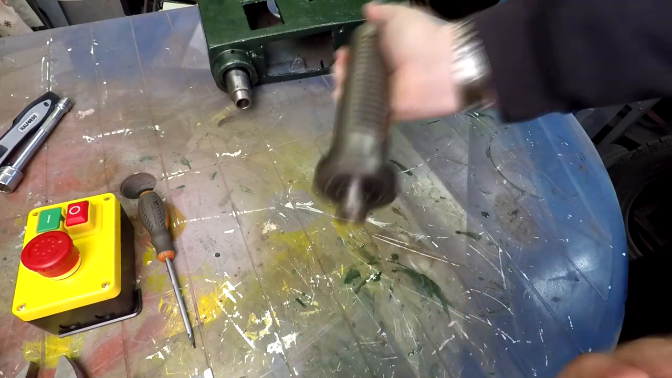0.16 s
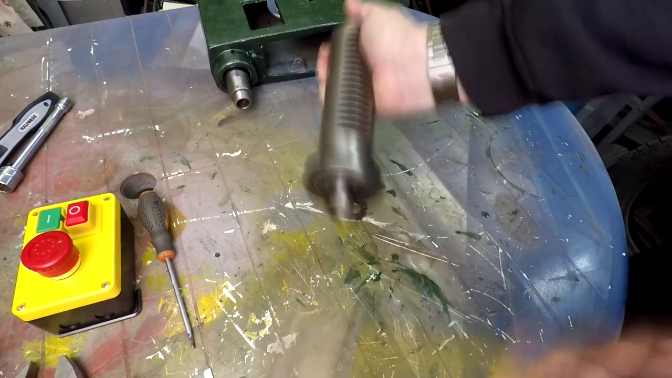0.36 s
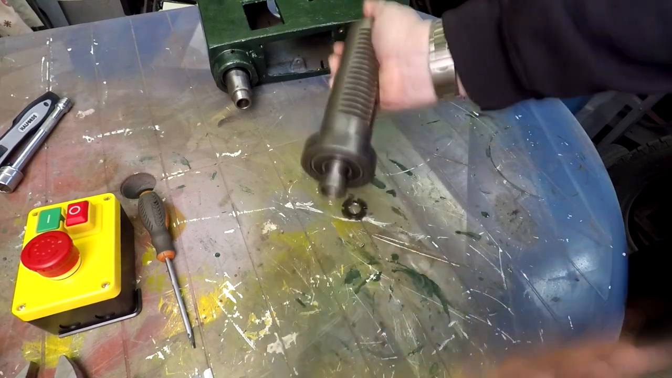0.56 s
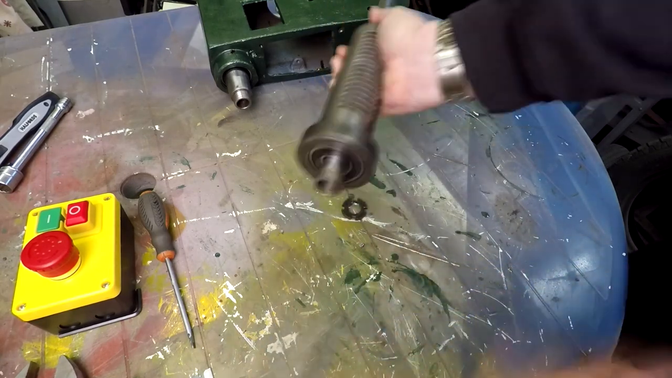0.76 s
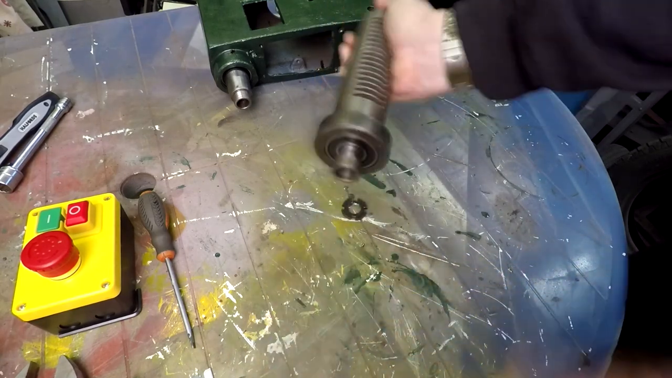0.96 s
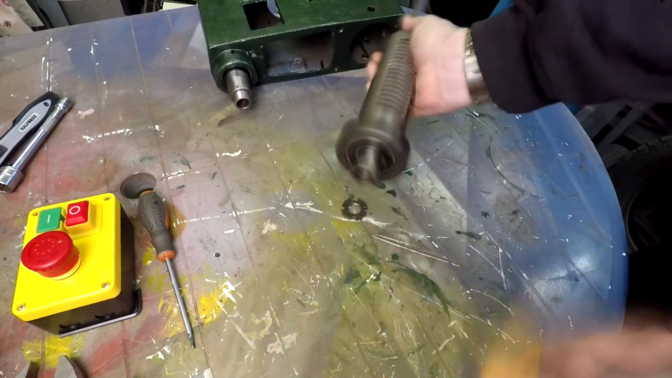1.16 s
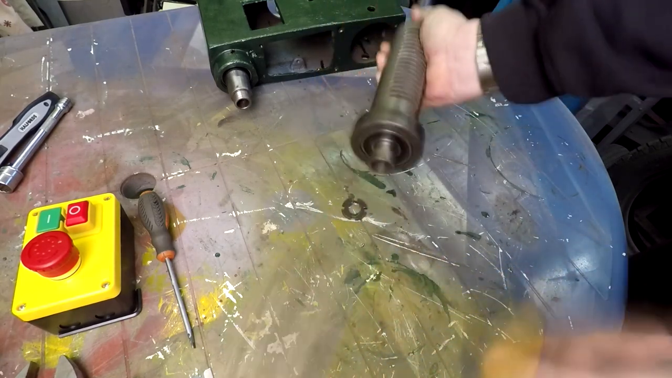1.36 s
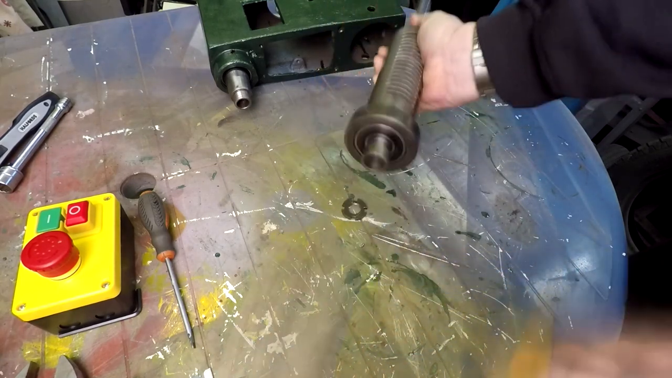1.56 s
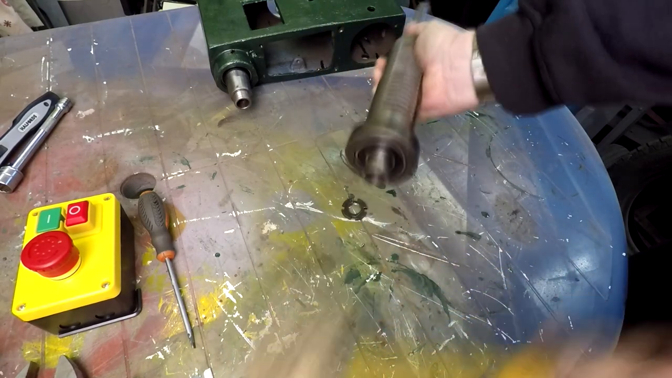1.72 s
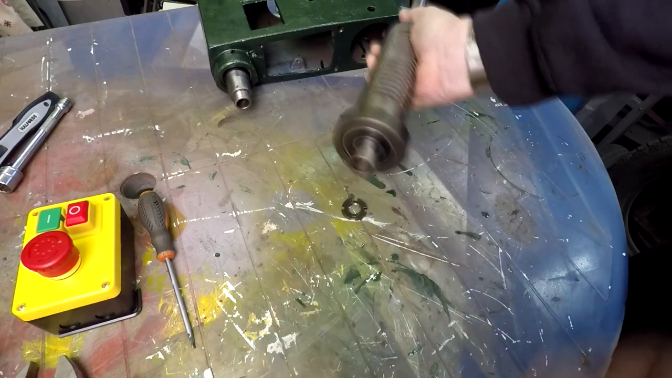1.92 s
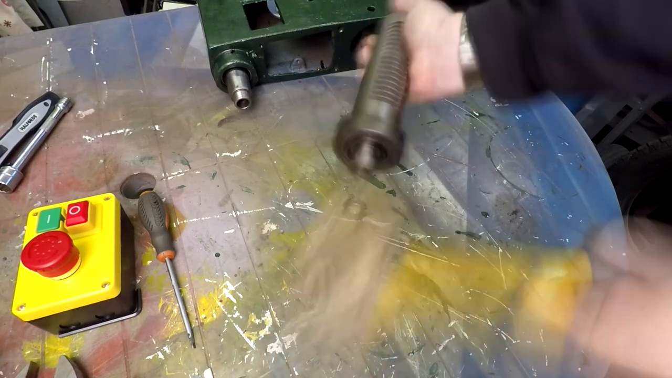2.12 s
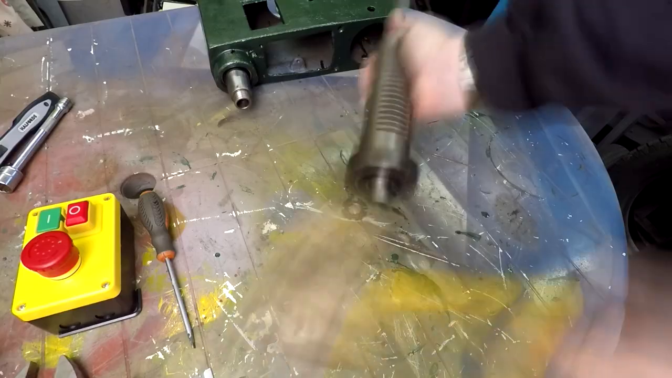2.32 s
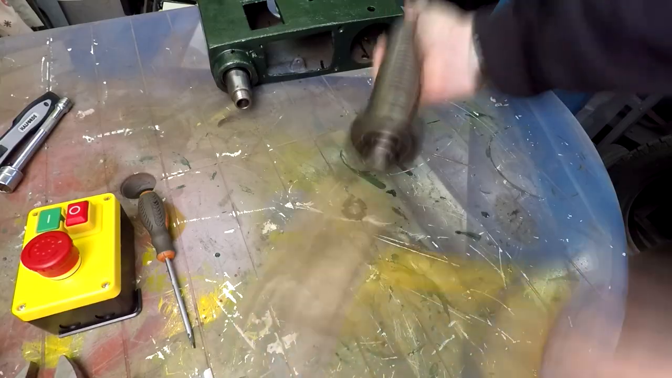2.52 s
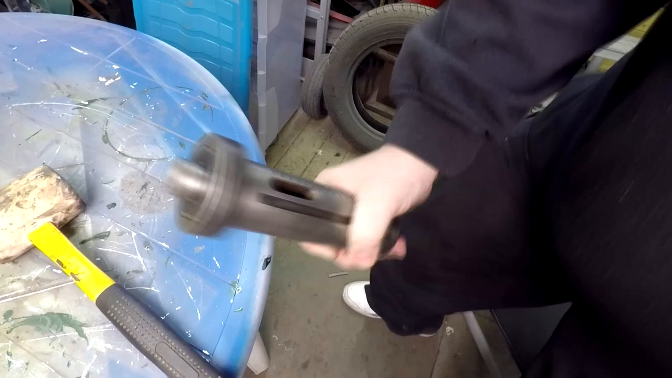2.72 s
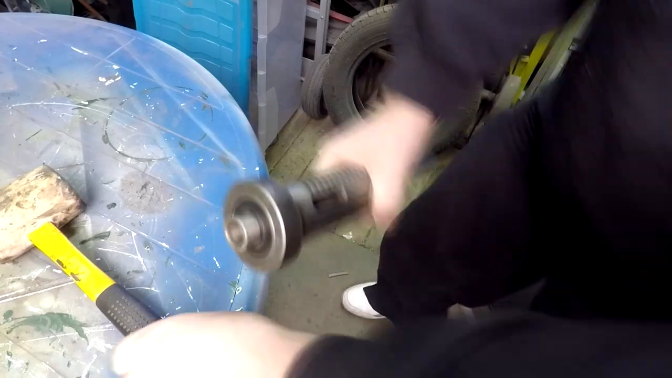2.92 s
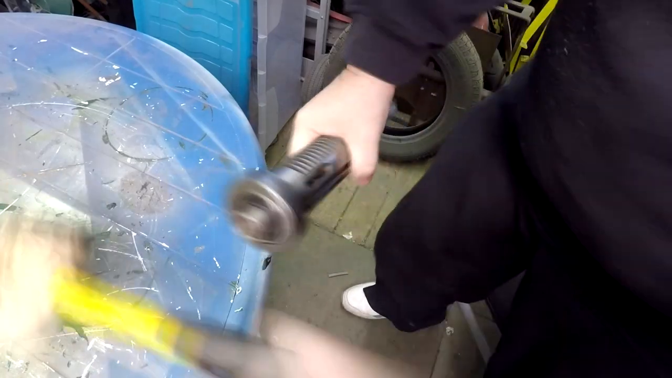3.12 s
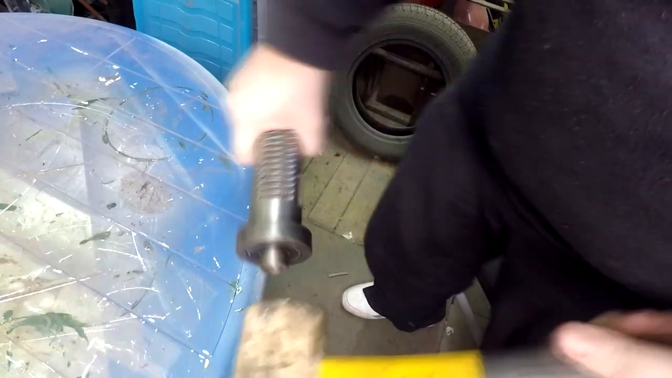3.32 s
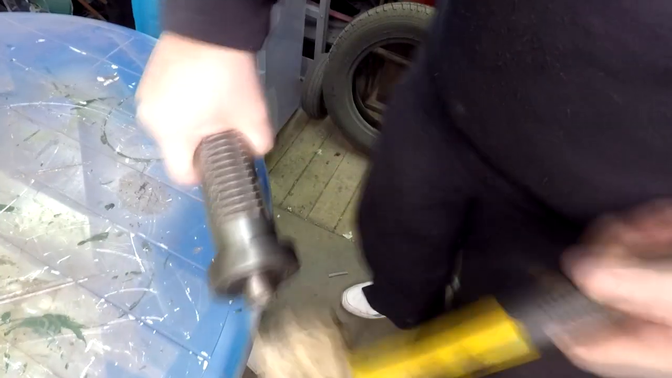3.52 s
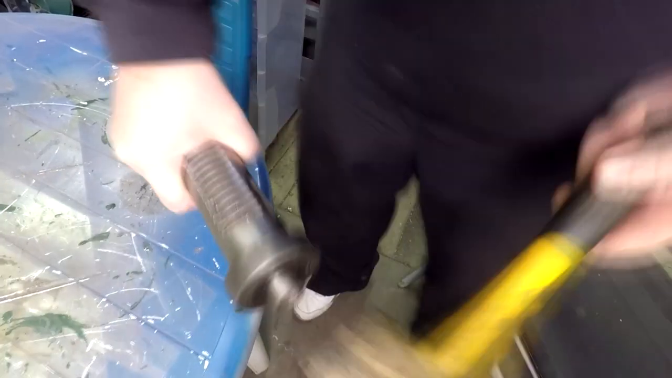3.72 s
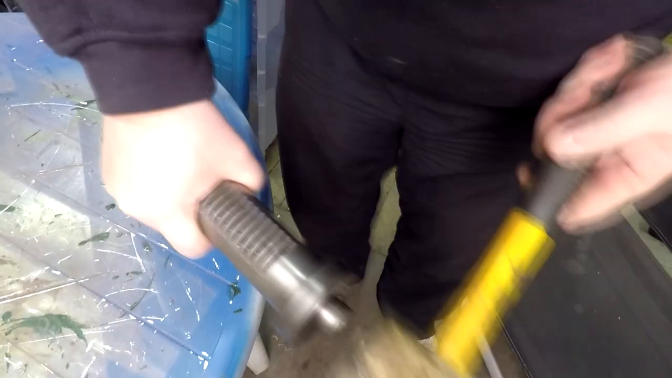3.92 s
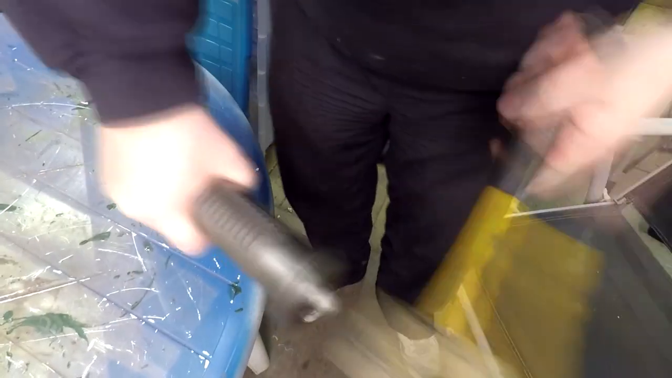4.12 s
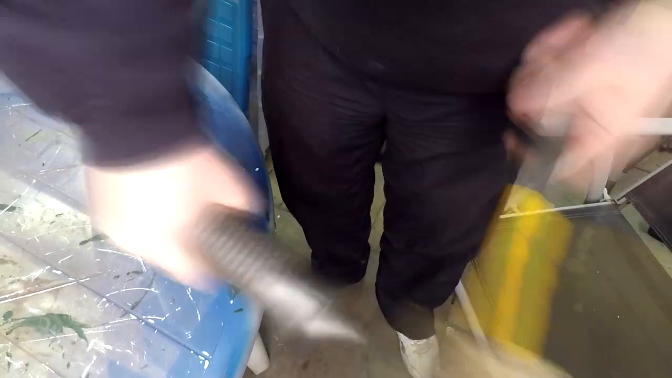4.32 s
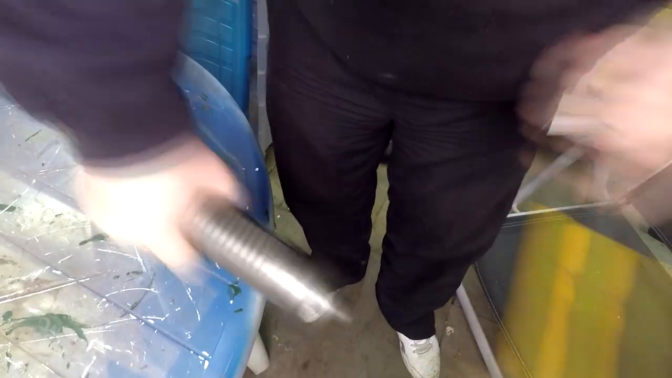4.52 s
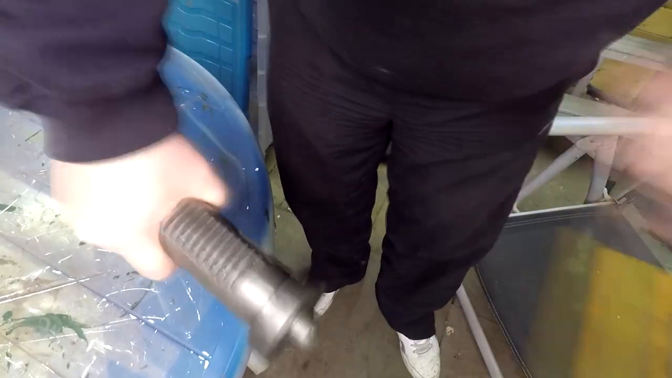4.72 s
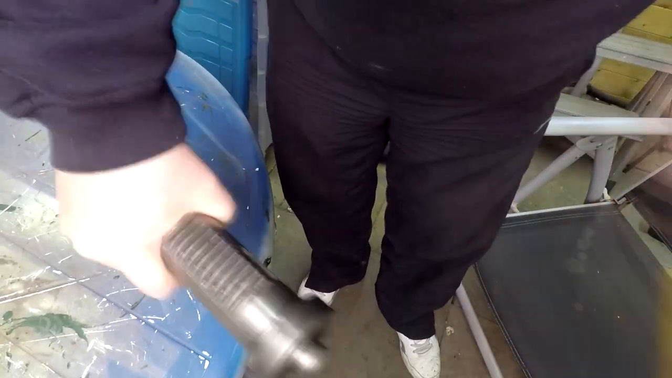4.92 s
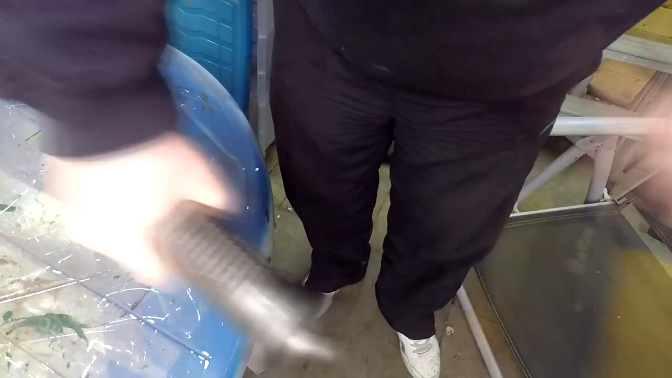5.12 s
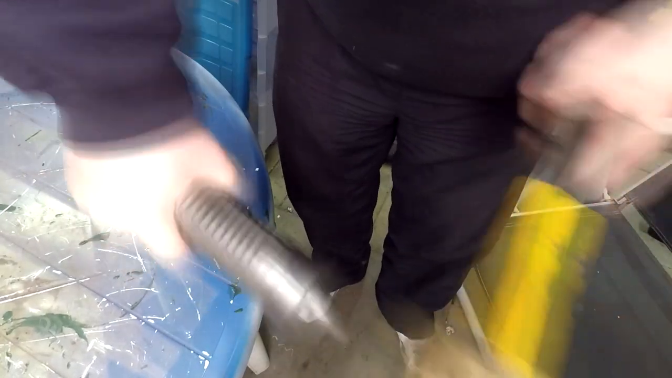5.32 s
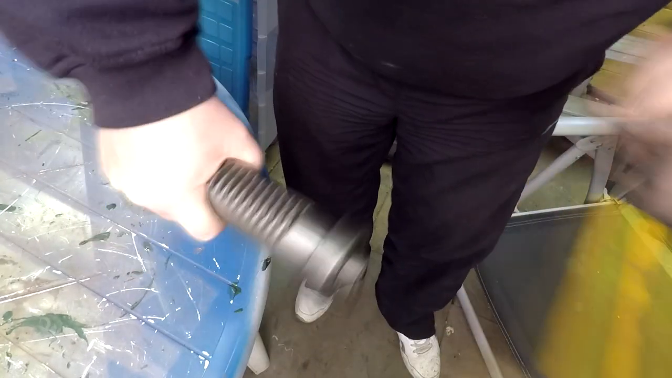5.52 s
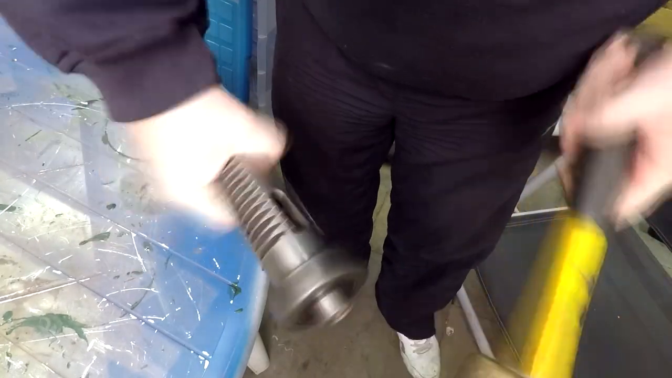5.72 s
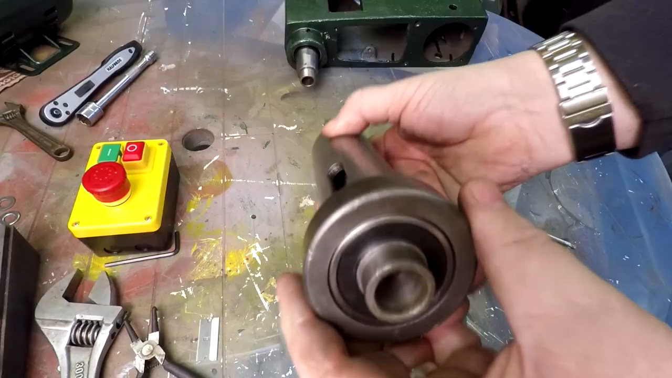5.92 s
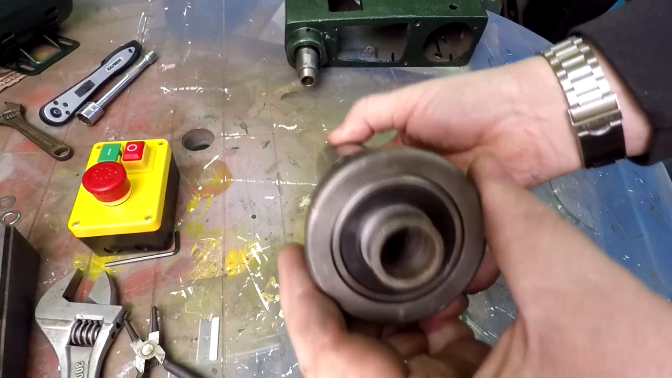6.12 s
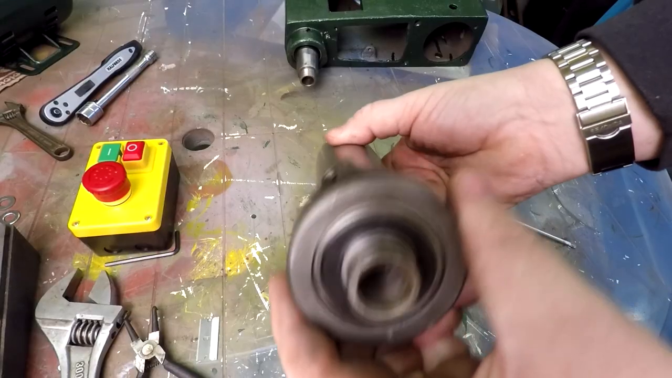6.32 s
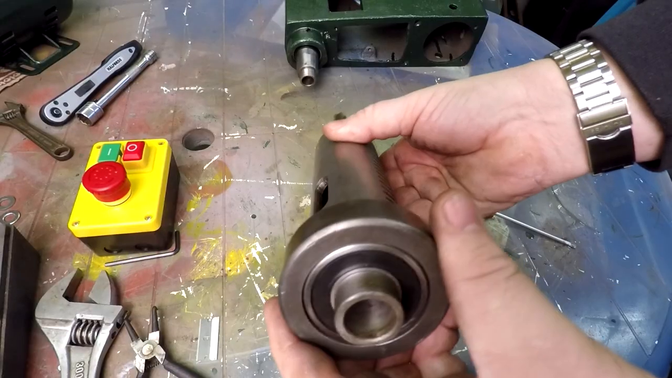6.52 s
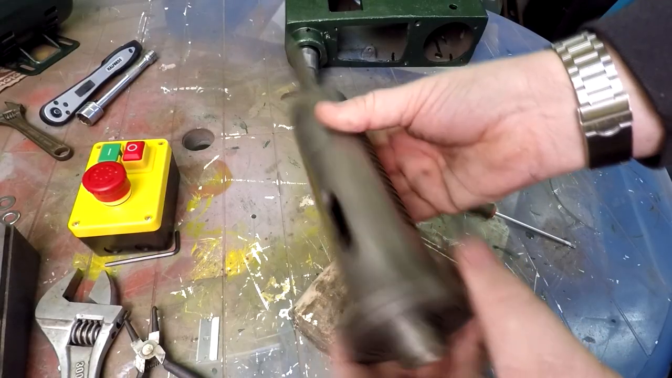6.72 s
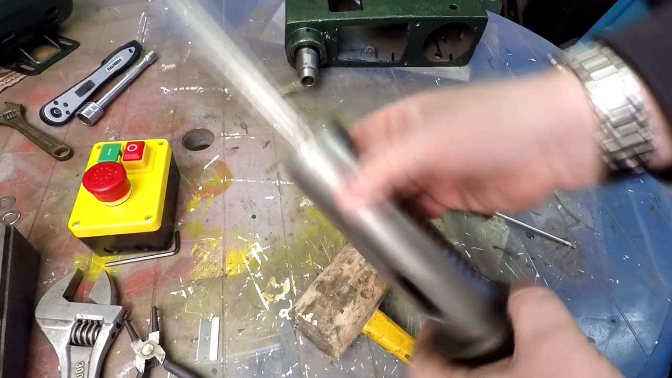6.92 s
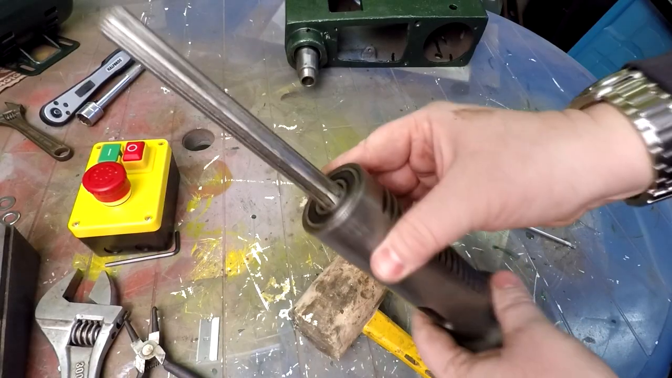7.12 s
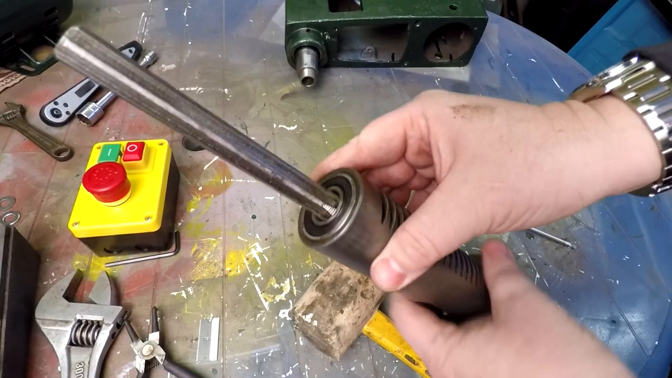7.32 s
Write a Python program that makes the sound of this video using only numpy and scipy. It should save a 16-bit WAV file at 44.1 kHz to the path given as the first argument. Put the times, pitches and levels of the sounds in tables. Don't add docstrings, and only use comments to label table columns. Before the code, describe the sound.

Wooden mallet blows clack in fast stuttering pairs on ringing, rattling steel; handling bumps interrupt, harder blows follow, then only a faint motor hum.

```python
import sys
import numpy as np
from scipy import signal
from scipy.fft import rfft, irfft
from scipy.io import wavfile
from scipy.ndimage import uniform_filter1d

SR = 44100
rng = np.random.default_rng(int(sys.argv[2]) if len(sys.argv) > 2 else 0)


def boost(x):
    u = np.asarray(x, float) / 20
    return 10 ** u


def output_pcm(signal):
    pcm = np.clip(np.atleast_2d(signal).T, -1, 1) * 32767
    wavfile.write(sys.argv[1], SR, np.round(pcm).astype(np.int16))


N = 324576

# (time [s], centre of the frame after the blow [ms],
# sleeve ring [dB], steel ring [dB], tilt of the steel towards the treble [dB per octave])
BENCH_HITS = [(0.2591, -11, -21, -26, -11), (0.3544, -12.5, -11.5, -21.5, -8),
              (0.4378, 1.5, -17.5, -21.5, -6.5), (0.53, -3.5, -12.5, -19.5, 8.5),
              (0.6222, 6.5, -24.5, -19.5, 3), (0.7313, -3, -11.5, -19, 3.5),
              (0.8412, -4.5, -12.5, -18.5, 8), (0.935, 3.5, -20, -17.5, 7), (1.038, 2, -10.5, -17, 3),
              (1.1416, -10, -10.5, -21, 8), (1.2361, 8, -12.5, -18, 6.5), (1.3402, -4.5, -14, -16.5, 5.5),
              (1.44, -3.5, -12.5, -17.5, 7.5), (1.5292, 14.5, -9.5, -21.5, 4.5),
              (1.6391, -7, -19, -17.5, -13.5), (2.0191, 17, -24, -16, 1.5),
              (2.1388, 8.5, -23.5, -19.5, -17), (2.244, -4, -9.5, -20, -2.5), (2.3325, 3, -14.5, -18, -2.5),
              (2.4279, 1, -14.5, -20.5, -10.5), (2.519, 16, -10, -19, -2.5), (2.619, -2.5, -14, -21, -20)]
FLOOR_HITS = [
    (4.1538, -7, -26, -16, 6),
    (4.3382, 4, -24.5, -8, 2),
    (4.5207, -8.5, -18, -10, 2.5),
    (4.6928, -1, -24.5, -10.5, -1),
    (4.8594, 1, -22, -10.5, -3),
    (5.0163, 7, -20.5, -10.5, -4.5),
    (5.1714, 4, -23.5, -11, 4.5),
    (5.332, -5, -15.5, -12.5, 5),
    (5.4824, 0.5, -10.5, -14, 8),
    (5.6429, 9.5, -19.5, -12.5, 8),
]
BENCH_JUMP, FLOOR_JUMP = 644, 566


def unit(x):
    return x / np.sqrt(np.mean(x ** 2))


def band(x, lo_hz, hi_hz, order=2):
    return signal.sosfilt(signal.butter(order, [lo_hz, hi_hz], "band", fs=SR, output="sos"), x)


def noise_band(lo_hz, hi_hz, order=1):
    return unit(band(rng.standard_normal(N), lo_hz, hi_hz, order))


def coloured(spectrum, x):
    hz, db = np.transpose(spectrum)
    f = np.maximum(np.fft.rfftfreq(len(x), 1 / SR), 1)
    gain = boost(np.interp(np.log(f), np.log(hz), db))
    return unit(irfft(rfft(x) * gain, len(x)))


def walk(rate):
    k = int(SR / rate)
    held = np.repeat(rng.standard_normal(N // k + 1), k)
    return 0.98 * uniform_filter1d(uniform_filter1d(held, k), k)[:N]


def swell(s, length, db, rise=0.27, fall=1.0):
    coarse = np.arange(0, N, 64)
    t = coarse / SR - np.asarray(s)[:, None]
    width = np.asarray(length)[:, None] * np.where(t < 0, rise, fall)
    power = (boost(np.asarray(db))[:, None] * np.exp(-(t / width) ** 2)) ** 2
    return np.interp(np.arange(N), coarse, np.sqrt(power.sum(0)))


def add(out, sound, s, centre_ms, skip):
    hop_ms, frame_ms = 14, 85
    t_ms = np.arange(len(sound)) / SR * 1000
    for frame in range(-1, 10):
        place = (t_ms - centre_ms - frame * (hop_ms + skip / SR * 1000)) / frame_ms
        fade = np.cos(np.pi * np.clip(place, -.5, .5)) ** 4
        start = int(s * SR) - frame * skip
        out[start:start + len(sound)] += fade * sound


def room_tone():
    # (frequency [Hz], width [Hz], level [dB])
    motor_lines = [(215, 8, -10.5), (555, 25, -29), (636, 43, 0), (650, 17, -10.5), (750, 58, -13.5),
                   (1224, 77, -7), (1330, 100, -14.5), (2290, 18, -19.5), (3140, 80, -29), (3720, 90, -27),
                   (5695, 100, -37), (10950, 50, -36.5)]
    # (frequency [Hz], level [dB per Hz])
    air_colour = [(100, -25.5), (210, -8), (450, -15), (800, -8), (1050, -28.5), (1400, -12), (1800, -36.5),
                  (3100, -26.5), (4500, -38.5), (9000, -61.5), (14000, -76.5)]
    # (from [s], motor [dB], air [dB], low air [dB], swell [dB per s])
    mic_places = [
        (0, -61.5, -62.5, -75, -0.05),
        (2.68, -70, -58.5, -56.5, -0.3),
        (4.13, -65.5, -58.5, -63, -1.7),
        (5.918, -59.5, -57, -66, 0.5),
    ]
    motor = np.zeros(N)
    for hz, width, db in motor_lines:
        motor += boost(db + .7 * walk(9.7)) * noise_band(hz - width / 2, hz + width / 2)
    main_hz = 615 + 2.0 * walk(3.2)
    motor += boost(7.5 + 0.72 * walk(22)) * np.sin(2 * np.pi * np.cumsum(main_hz) / SR)
    air = coloured(air_colour, rng.standard_normal(N)) * boost(0.5 * walk(8.3))
    low = noise_band(30., 220.) * boost(1.9 * walk(4.2))
    t, rows = np.arange(N) / SR, np.array(mic_places)
    since, motor_db, air_db, low_db, swell_db = rows[np.searchsorted(rows[1:, 0], t)].T
    drift = boost(swell_db * (t - since))
    return drift * (boost(motor_db) * motor + boost(air_db) * air) + boost(low_db) * low


def fibre_grains():
    grains = rng.standard_normal(N) * boost(2.6 * rng.exponential(size=N))
    return grains * boost(2.5 * walk(220) + 1.5 * walk(60))


def cloth_and_skin(body, top, dull):
    # (loudest [s], length [s], level [dB], brightness [dB])
    rubs = [(0.0, 0.054, -60.5, -1.5), (1.98, 0.082, -67, -3), (2.777, 0.025, -47.5, -18),
            (2.847, 0.074, -62.5, -34), (2.994, .03, -59, -5), (3.013, 0.015, -39.5, -11),
            (3.058, 0.056, -51, -36), (3.171, 0.029, -51, -22), (3.215, 0.016, -56, -4),
            (3.457, 0.025, -48.5, -17), (3.508, 0.02, -38.5, -9), (3.616, 0.15, -57, -37),
            (3.674, 0.045, -39, -31), (3.735, 0.037, -53, -20), (3.8, 0.064, -44.5, -4.5),
            (3.843, 0.021, -42, -15), (3.89, 0.026, -52, -8), (3.928, .025, -44, -10),
            (3.968, 0.025, -63, -16), (4.007, 0.024, -55, -2), (3.32, 0.12, -83, -20),
            (4.442, 0.088, -59.5, -34), (4.79, 0.085, -58.5, -26), (6.724, .09, -72.5, 9),
            (6.887, .09, -75.5, 10), (7.02, 0.19, -67, -10), (7.25, 0.055, -71.5, 7),
            (7.341, 0.083, -64.5, 5.5)]
    s, length, db, bright_db = np.transpose(rubs)
    shape = dict(rise=0.58, fall=0.98)
    level = swell(s, length, db, **shape)
    stiff = swell(s, length, db + bright_db - 9.0, **shape)
    soft = swell(s, length, db - 15 - 0.34 * bright_db, **shape)
    return level * body + soft * dull + stiff * top


def squeak(grains):
    gain = swell([7.0], [0.14], [-69.5], 0.44, 1.9)
    return gain * unit(band(grains, 3135.0, 3157.0, order=1))


def add_ticks(out, body, top, dull):
    # (time [s], level [dB], brightness [dB], dull part [dB], decay [s])
    taps = [
        (1.951, -50, 6, -23, 0.0028),
        (2.692, -63.5, 19, -12, .002),
        (3.08, -58, -30, 22.5, 0.016),
        (3.265, -56, 3, -15, 0.018),
        (3.932, -39, 1, 3, 0.0055),
        (4.006, -55, 13, -17, .003),
        (7.1, -55, 3.5, -15, 0.0085),
    ]
    t = np.arange(2000) / SR
    for s, db, bright_db, dull_db, decay in taps:
        at = slice(int(s * SR), int(s * SR) + len(t))
        mix = body[at] + boost(bright_db - 11.5) * top[at] + boost(dull_db) * dull[at]
        add(out, boost(db) * np.exp(-t / decay) * mix, s, -3.0, BENCH_JUMP)


def rustle():
    # (frequency [Hz], level [dB per Hz])
    cloth_colour = [(700, -17), (1200, -6.5), (1900, -6), (3700, -8), (4800, -14), (6500, -24.5)]
    grains = fibre_grains()
    body = coloured(cloth_colour + [(16000, -57.5)], grains)
    top = unit(band(grains, 4700.0, 12000.0))
    dull = unit(band(grains, 240.0, 730.0, order=1))
    out = cloth_and_skin(body, top, dull) + squeak(grains)
    add_ticks(out, body, top, dull)
    return out


def shake():
    # (loudest [s], length [s], level [dB])
    mic_swings = [(2.75, 0.051, -29), (2.823, 0.041, -24.5), (3.06, 0.096, -28), (3.465, 0.065, -11.5),
                  (3.551, 0.048, -10), (3.774, 0.076, -14.5), (3.872, 0.061, -10.5), (4.75, 0.14, -32),
                  (1.717, 0.063, -46.5), (3.3, 0.18, -45.5), (3.663, 0.083, -26), (4.044, .1, -36),
                  (5.811, .08, -41)]
    swing = noise_band(16., 34., order=2)
    swing /= np.sqrt(uniform_filter1d(swing ** 2, 5000) + 0.26)
    late_s, jolt_s = 0.012, 0.061
    jolts = [(row[0] + late_s, jolt_s, -38.5) for row in BENCH_HITS]
    jolts += [(row[0] + late_s, jolt_s, -27.5) for row in FLOOR_HITS]
    moved = boost(-50.5) + swell(*np.transpose(mic_swings + jolts))
    step_s, rise_s, decay_s = 5.918, 0.0092, 0.96
    t = np.arange(N) / SR - step_s
    step = -0.059 * np.sin(np.pi / 2 * np.clip(t / rise_s, 0, 1)) ** 2 * np.exp(-t / decay_s)
    rumble = boost(-54.0) * noise_band(11.0, 70.0)
    return np.where(t < 0, boost(-2.0) * moved * swing, step + rumble)


def modes(table, t, rise_s, scatter_db, rough):
    hz, db, t60 = np.transpose(table)[:, :, None]
    chance = rng.standard_normal((3, len(table), 1))
    wander = np.cumsum(rng.standard_normal((len(table), len(t))), axis=1)
    flutter = rough * uniform_filter1d(wander, size=40)
    phase = 2 * np.pi * hz * (1 + 0.0071 * chance[1]) * t + 9 * chance[2] + flutter
    y = boost(db + scatter_db * chance[0]) * np.sin(phase)
    return (y * np.exp(-np.log(1000) * t / t60)).sum(0) * (1 - np.exp(-t / rise_s)) ** 2


def tinted(table, low_db, tilt, seat_db):
    rows = []
    for hz, db, t60 in table:
        if hz < 1000:
            tint = low_db
        else:
            tint = tilt * np.clip(np.log2(hz / 3100), -.6, .6)
        seat = seat_db * np.exp(-(np.log2(hz / 3070) / 0.13) ** 2)
        rows.append((hz, db + tint + seat, t60))
    return rows


def mallet_thump(t, sag_hz):
    push = -np.exp(-np.abs((t - .003) / 0.0018) ** 3)
    thump = signal.sosfilt(signal.butter(1, sag_hz, "high", fs=SR, output="sos"), push)
    thump += 0.42 * np.sin(2 * np.pi * 310 * t) * np.exp(-t / 0.0031)
    thump -= 0.036 * np.sin(2 * np.pi * 30 * t) * np.exp(-t / .08)
    return thump


def blow(ring, steel, room, sag_hz, thump_db, ring_db, steel_db, crack_db):
    t = np.arange(len(room)) / SR
    chatter = np.exp(-t / .002) + .22 * np.exp(-t / .011) + .04 * np.exp(-t / .035)
    chatter *= 1 - np.exp(-t / .0004)
    crack = band(rng.standard_normal(len(t)), 5500., 8900.0) * chatter
    rattle = band(rng.standard_normal(len(t)), 2200.0, 3900.0, order=1) * chatter
    struck = modes(steel, t, .0004, 1, .14)
    late = np.maximum(t - .0015, 0)
    direct = boost(ring_db + 7.5) * modes(ring, late, 0.00044, 0.84, .025)
    direct += boost(steel_db + 3.0) * struck
    direct += boost(steel_db + 7.5) * rattle
    direct += boost(crack_db + 1.0) * crack
    direct += boost(thump_db + 5.5) * mallet_thump(t, sag_hz)
    heard = direct + signal.fftconvolve(direct[:350], room)[:len(t)]
    return 0.86 * np.tanh(heard / 0.8)


def garage(db):
    # (frequency [Hz], level [dB], time to fall by 60 dB [s])
    echo_bands = [(155, -6.5, 0.32), (675, 2.5, 0.19), (1500, 1.5, 0.14), (3000, -0.5, 0.23),
                  (5750, -5.5, 0.1), (12000, -29.5, .2)]
    t = np.arange(int(.26 * SR)) / SR
    tail = np.zeros(len(t))
    for hz, d, t60 in echo_bands:
        tail += boost(d) * band(rng.standard_normal(len(t)), hz / 1.8, hz * 1.7, order=1) * 1000 ** (-t / t60)
    return boost(db) * tail * (1 - np.exp(-t / 0.0035)) / np.sqrt(np.sum(tail ** 2))


def bout(out, blows, ring, steel, grip, seat, room_db, sag_hz, skip):
    thump_db, thump_drift, low_ring_db, low_ring_drift, first_low_ring_db = grip
    room = garage(room_db)
    for k, (s, centre_ms, ring_db, steel_db, tilt) in enumerate(blows):
        since = s - blows[0][0]
        light_db = -3.5 if k == 0 else 0
        low_db = low_ring_db + low_ring_drift * since if k else first_low_ring_db
        sleeve = tinted(ring, low_db - ring_db, 0, 0)
        spindle = tinted(steel, 0, tilt, seat[0] + seat[1] * since)
        crack_db = steel_db - 14 + 1.6 * tilt
        push_db = thump_db + thump_drift * since + light_db
        sound = blow(sleeve, spindle, room, sag_hz, push_db, ring_db, steel_db, crack_db)
        add(out, sound, s, centre_ms, skip)


def add_bumps(out):
    # (time [s], level [dB], frequency [Hz], time to fall by 60 dB [s])
    knocks = [(2.825, -25, 108, 0.031), (2.918, -30, 119, 0.12), (3.009, -37, 102, 0.093),
              (3.076, -14.5, 150.6, 0.14), (3.081, -29.5, 220, 0.08), (4.81, -33, 250, 0.092),
              (3.505, -20.5, 99, 0.15), (3.644, -14.5, 149, 0.035), (3.92, -9, 96, 0.014),
              (3.936, -29, 91, 0.06), (4.009, -26.5, 148.4, 0.061)]
    # (frequency ratio [1], level [dB], share of the fall time [1])
    knock_rings = [(1, 0, 1), (.64, -6.5, 1), (1.52, -7, 1), (3.1, -22, 1.1), (4.6, -30, .8)]
    t = np.arange(int(.3 * SR)) / SR
    for s, db, hz, t60 in knocks:
        rings = [(ratio * hz, db + d, share * t60) for ratio, d, share in knock_rings]
        add(out, modes(rings, t, 0.0017, 0.46, 0), s, 3.0, FLOOR_JUMP)


def mallet():
    # (frequency [Hz], level [dB], time to fall by 60 dB [s])
    bench_sleeve = [(1505, -7.5, 0.061), (1569, -4.5, 0.029), (1415, -3, 0.032), (1202, -2, 0.013),
                    (822.3, -7, 0.03), (551, -16.5, 0.04)]
    bench_spindle = [(2346, -4.5, 0.056), (2550, -7, 0.042), (2923, -9, 0.017), (3054, -0.5, 0.02),
                     (3784, 2.5, 0.024), (4267, 5, 0.0058), (5040, -13.5, 0.037), (7400, -25, .03),
                     (8550, -23, 0.018), (9300, -45.5, .02), (11700, -35, 0.1)]
    floor_sleeve = [(1480, 7, 0.022), (1240, 4, 0.012), (679.5, -1.5, 0.041), (552, -12, 0.096),
                    (425, -11.5, 0.053)]
    floor_spindle = [(2299, -1.5, 0.031), (2460, -16, 0.012), (2820, 1.5, 0.0093), (3268, -7, 0.017),
                     (3996, -10, 0.038), (4645, -4.5, 0.034), (4460, -10, 0.025), (5360, -24.5, 0.029),
                     (7400, -14, 0.035), (8160, -10, 0.017), (9240, -8, 0.013), (9960, -14, 0.0084),
                     (12530, -33.5, 0.098)]
    out = np.zeros(N)
    # ring of the bearing seat [dB], its drift [dB per s]
    bout(out, BENCH_HITS, bench_sleeve, bench_spindle, grip=(-13, -0.2, -20.5, 1.5, -19.5), seat=(-0.98, 2.2),
         room_db=-17.0, sag_hz=26.0, skip=BENCH_JUMP)
    bout(out, FLOOR_HITS, floor_sleeve, floor_spindle, grip=(-11, 1.5, -12.5, -9, -38.5), seat=(6.1, -4),
         room_db=-17.5, sag_hz=78.0, skip=FLOOR_JUMP)
    add_bumps(out)
    return out


def scene():
    return (room_tone() + rustle() + shake() + mallet())[None]


def band_limit(x):
    return signal.sosfilt(signal.butter(12, 16520, fs=SR, output="sos"), x)


def record(dry):
    rounded = np.tanh(0.83 * dry) / 0.84
    soft = signal.sosfilt(signal.butter(12, 15200., fs=SR, output="sos"), rounded)
    return band_limit(soft)


dry = scene()
out = record(dry)
output_pcm(out)
```